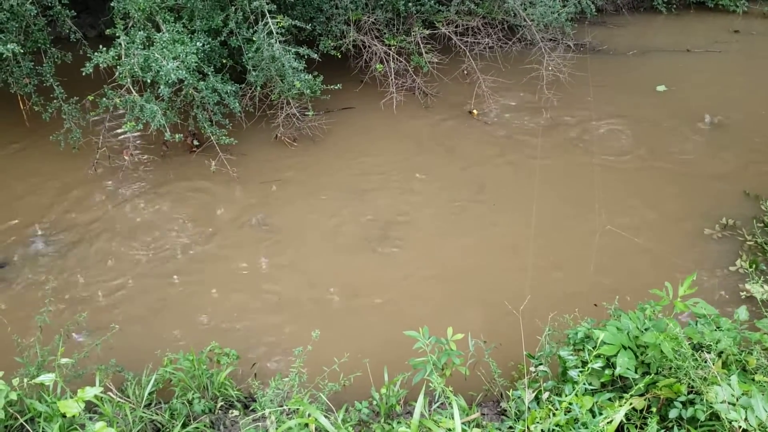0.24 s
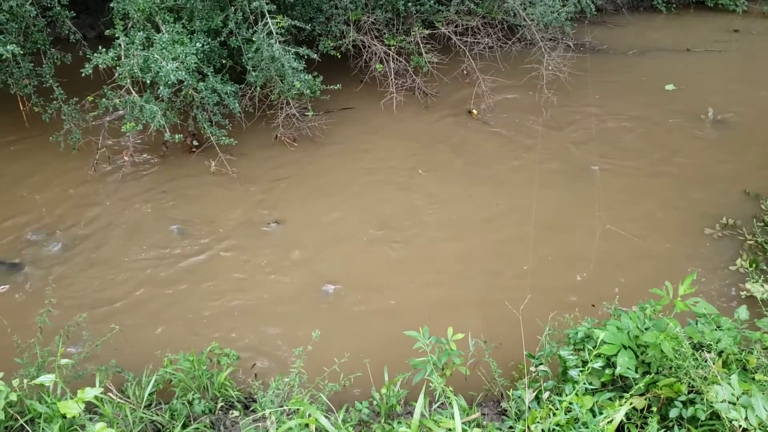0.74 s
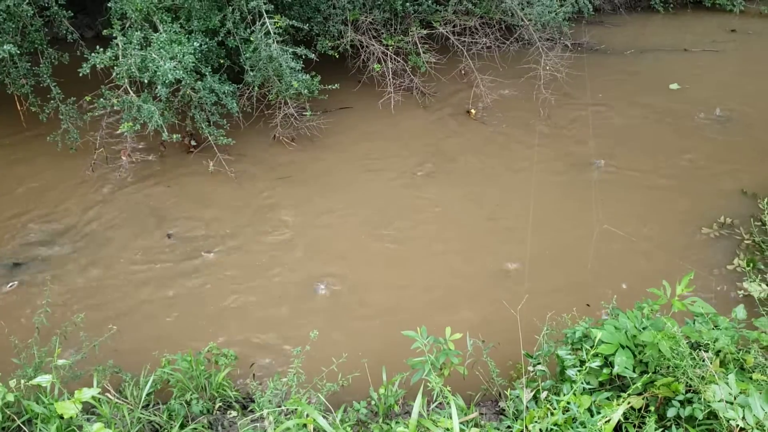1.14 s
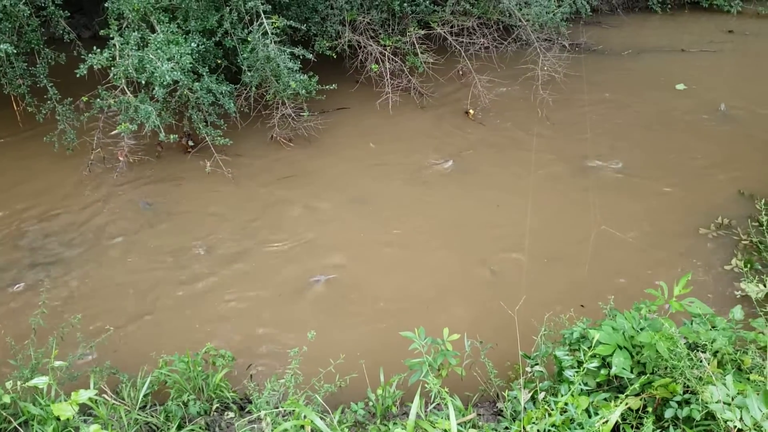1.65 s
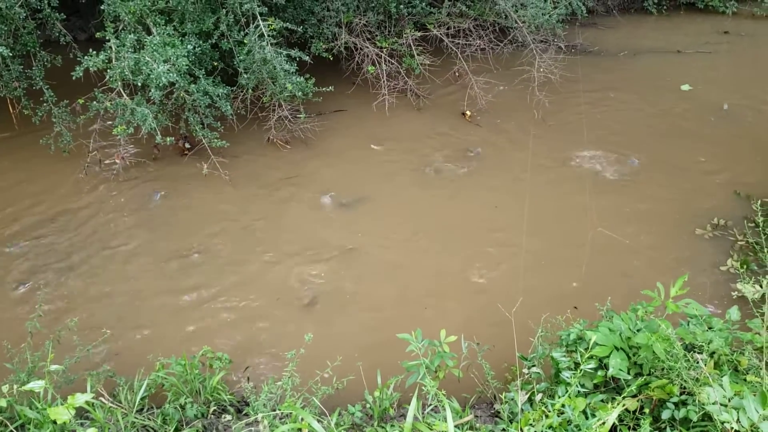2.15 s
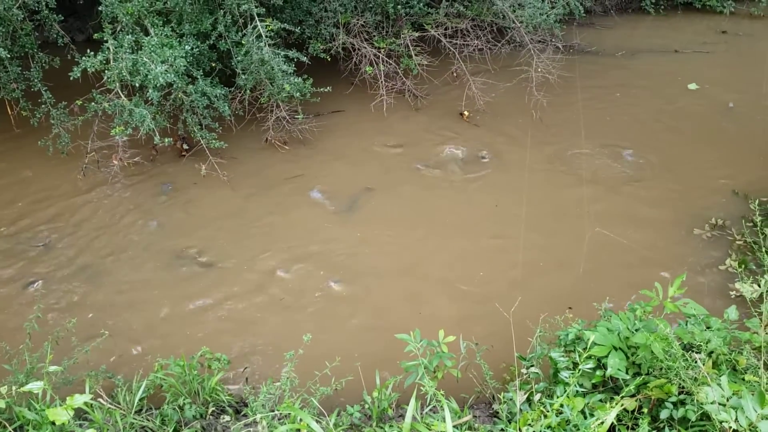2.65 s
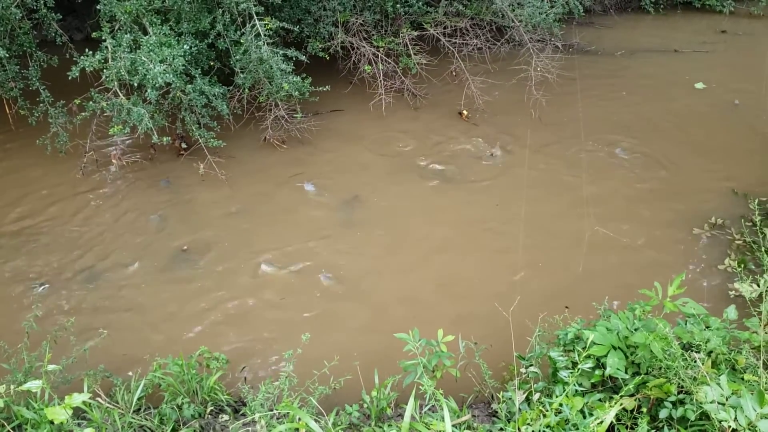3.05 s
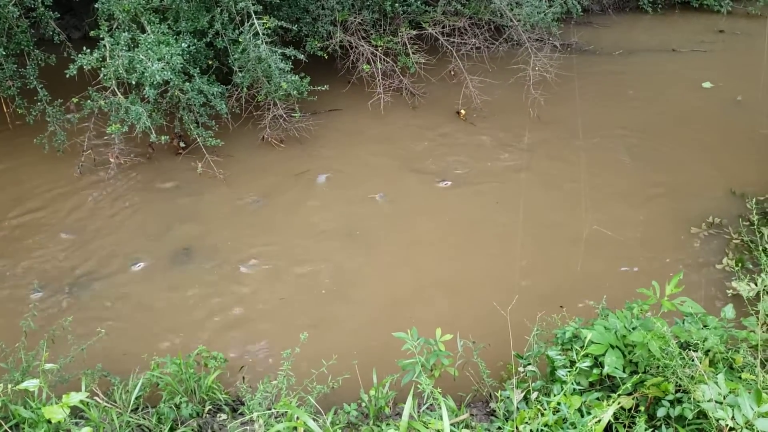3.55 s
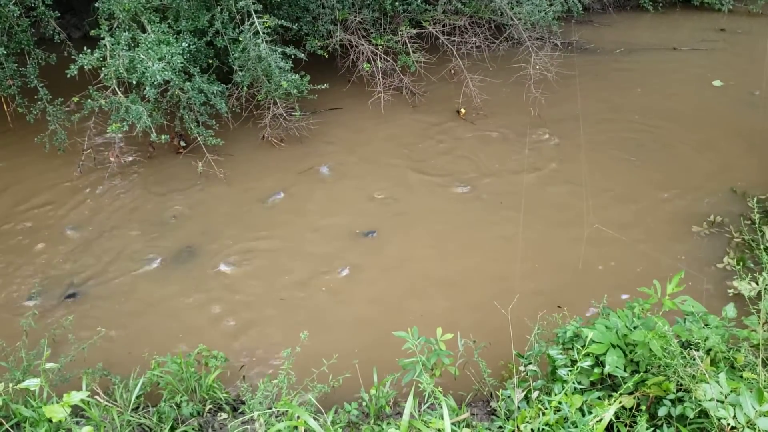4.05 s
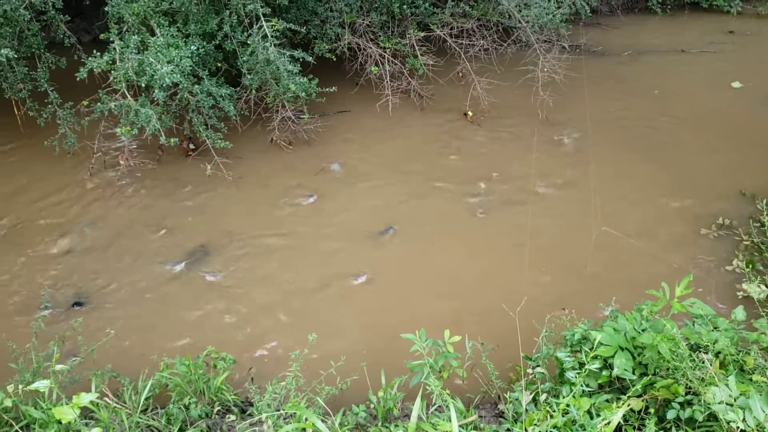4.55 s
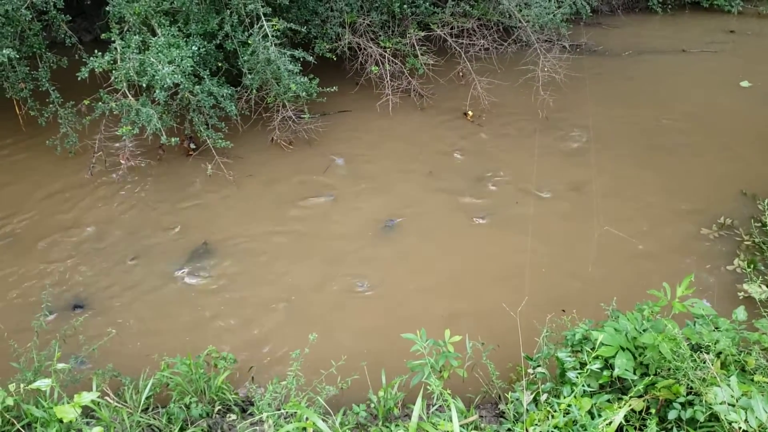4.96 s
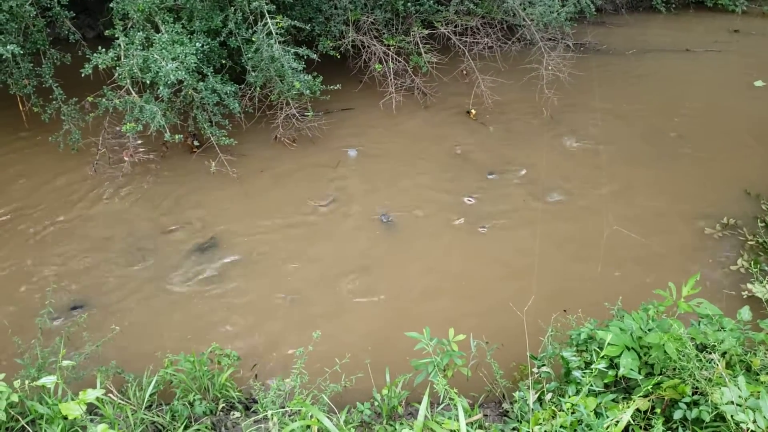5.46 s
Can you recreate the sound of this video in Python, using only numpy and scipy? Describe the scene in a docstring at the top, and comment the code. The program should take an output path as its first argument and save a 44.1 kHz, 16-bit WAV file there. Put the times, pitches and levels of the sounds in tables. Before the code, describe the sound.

Watery plops and two crackling bursts of churning splashes, close by, over a quiet low outdoor rumble with faint insect hiss.

```python
"""A far rumble, a wavering motor-like note and a thin insect hiss lie under a muddy creek, all shaped noise.
From the start, fish gulp and plop as ringing air pockets, fine spray puffs up, needle-thin ticks fall
and a breathy hiss fades. At about 1.5-2.9 s and again at 4.6-5.7 s something rushes and crackles close by,
as if water and leaves were churned at the bank: dense cracks, ringing drops and sharp snaps of noise.
The rush reaches the left microphone first, and each microphone colours it in its own way."""
import sys
import numpy as np
from scipy import signal
from scipy.fft import rfft, irfft
from scipy.io import wavfile

SR = 44100
rng = np.random.default_rng(int(sys.argv[2]) if len(sys.argv) > 2 else 0)


def field_ratio(decibels):
    """Amplitude ratio for a level in dB (20 dB per decade); scalars and array-likes work."""
    return 10 ** (np.asarray(decibels, dtype=float) / 20)


def digitize_waveform(pressure):
    """Quantize a signal to 16-bit integers and store it at the path in sys.argv[1].

    Rows of a 2-D input are taken as channels; values are limited to [-1, 1].
    """
    field = np.atleast_2d(pressure).T
    bounded = np.clip(field, -1, 1)
    quanta = np.round(bounded * 32767).astype(np.int16)
    wavfile.write(sys.argv[1], SR, quanta)


N = 251792  # length in samples

# Spectrum of the steady surroundings: pitch_hz, left_db_per_hz, right_db_per_hz
AIR_SPECTRUM = [(28.5, -74, -94), (56, -70, -66.5), (90, -66, -67.5), (106, -72.5, -77.5), (148, -84, -78),
                (293, -88.5, -88.5), (515, -98, -97), (1060, -97, -91), (1700, -103, -92.5),
                (2140, -108, -103), (4200, -112, -102), (6700, -108, -101), (7650, -114, -105),
                (9680, -100, -93.5), (10500, -110, -104), (13400, -112, -103), (15000, -110, -112)]
# How alike the surroundings are at both ears: pitch_hz, likeness_0_to_1
AIR_LIKENESS = [(60, 1), (260, 0.94), (600, 0.3), (1100, 0.88), (2000, 0.16), (3500, 0.15), (9000, 0.021)]
# Gulps and plops, level before swell and pan: start_s, level_db, pitch_hz, right_lead_ms
BUBBLES = [(.017, -43, 375, 0.18), (0.175, -34, 1610, 0.39), (.207, -37.5, 1280, 0.54),
           (.229, -45, 1530, 0.4), (0.339, -51, 1650, 0.25), (.36, -38.5, 1760, 0.27),
           (.379, -45, 1410, 0.35), (.466, -49.5, 4560, .23), (.467, -42.5, 1555, .3),
           (0.626, -47.5, 1680, 0.32), (.649, -39, 1830, .38), (0.683, -46, 4700, .13),
           (.667, -52, 2180, 0.36), (.68, -51, 1540, 0.23), (.816, -43.5, 1550, 0.23),
           (0.836, -48, 1930, 0.41), (1.133, -50, 1540, 0.75), (1.2857, -48, 3180, .22),
           (1.348, -44.5, 1370, 0.51), (1.37, -50, 900, 0.44), (1.399, -42, 2960, 0.25),
           (1.416, -51, 1620, .54), (1.452, -46, 750, 0.34), (1.562, -47, 975, 0.85),
           (1.925, -34, 810, 0.23), (1.944, -46, 940, -0.0054), (2.14, -42, 720, 0.022),
           (2.64, -50, 830, 0.26), (2.685, -48, 1240, .3), (2.81, -50, 1890, 0.26), (2.96, -58, 900, .14),
           (3.01, -47.5, 900, 0.22), (3.012, -50, 1420, 0.57), (3.097, -51.5, 930, 0.23),
           (3.098, -48, 1520, .43), (3.115, -51, 760, .22), (3.166, -54, 940, 0.39),
           (3.245, -49, 3400, .28), (3.287, -51, 1660, 0.075), (4.129, -52.5, 966, -.13),
           (4.373, -38.5, 857, 0.053), (4.471, -34, 1590, 0.36), (4.53, -34, 188, -0.21),
           (4.53, -29.5, 481, -0.37), (4.541, -37, 407, -0.27), (5.663, -49, 905, .03)]
# Necks of air that close slowly and whistle upward: start_s, level_db, pitch_hz, right_lead_ms
GLIDES = [(3.022, -58, 1025, .72), (4.39, -52.5, 953, -0.2), (4.551, -48.5, 695, .09),
          (4.583, -55, 900, 0.26), (4.591, -54.5, 1255, 0.2), (5.64, -52, 960, 0.2)]
# Low gurgles that nearly hold their pitch: start_s, level_db, pitch_hz, right_lead_ms
GURGLES = [(.405, -53, 750, 0.29), (.42, -51, 696, 0.3), (.517, -52, 688, .25), (.533, -54, 658, .2),
           (.551, -48, 695, .17), (.702, -54, 765, -.21), (.724, -56, 1047, -0.2), (.745, -61, 900, -0.14),
           (.767, -59, 834, -0.42), (2.712, -40, 440, -.3)]
# Stereo balance of the bubbles: pitch_hz, left_over_right_db
WATER_PAN = [(300, 0), (800, -7.5), (1600, -11.5), (4000, -19.5)]
# Reflections of the bubbles from the banks: delay_s, level_db
BANK_ECHOES = [(0.013, -12), (.023, -19.5), (.041, -35)]
# Colour of nearby sounds at each microphone: pitch_hz, left_db, right_db
RUSH_COLOUR = [(201, -2, -11.5), (265, -6, -10.5), (414, 1, 4.5), (560, -11.5, -8), (900, -0.5, -3),
               (1280, -0.5, 2.5), (1980, -2, 5), (2970, 0.5, 1), (3560, -6, 1), (3900, -4.5, 0.5),
               (4700, -5.5, 3), (6340, -10, 2.5), (7130, -12.5, -8), (8320, -10, -4), (10760, -7, -10.5),
               (12100, -2, -1), (16400, -13, -1.5)]
# Borders between body, spatter, crackle and sizzle: pitch_hz
RUSH_EDGES_HZ = 615, 2700, 8360
# Body, spatter, crackle, sizzle: octaves_above_1_khz, level_db at full vigour before tilt, vigour_share
PARTS = [(-1.85, -45, 1), (0.86, -46.5, 0.83), (2.5, -43.5, 1.25), (3.5, -60.5, 0.33)]
# How hard the bank is churned: time_s, vigour_db, brightness_db_per_octave
CHURN = [(1.3, -84.5, -5), (1.531, -60.5, 0), (1.556, -56, -3.5), (1.59, -45, 0), (1.68, -68.5, -2.5),
         (1.759, -56, -3.5), (1.839, -61, -2), (1.863, -49, -2), (1.95, -57, -2.5), (1.987, -43, -1.5),
         (2.09, -40.5, 1.5), (2.16, -53.5, 0.5), (2.27, -41.5, 2.5), (2.31, -45.5, 2), (2.4, -41, 1.5),
         (2.49, -51, 0), (2.57, -53, 0.5), (2.62, -49, -1.5), (2.659, -59.5, -0.5), (2.86, -62, -1.5),
         (2.93, -73.5, 2), (4.299, -77.5, -1.5), (4.62, -63.5, -0.5), (4.72, -62.5, -3), (4.84, -57, -3),
         (4.976, -40.5, 1), (5.055, -47.5, 0), (5.15, -41, 0.5), (5.215, -49, 0.5), (5.31, -41, 2.5),
         (5.36, -43.5, 2), (5.39, -43.5, 0.5), (5.47, -46.5, 3.5), (5.57, -50.5, -0.5), (5.71, -64, 1.5)]
# Puffs of fine spray: peak_s, level_db, swell_s, t60_s
SPRAYS = [(.03, -56, 0.033, 1.6), (.235, -54, 0.15, 2.2), (.92, -61, 0.24, 0.27), (1.4, -60.5, 0.075, 0.47),
          (1.939, -48, .02, 0.49), (3.675, -49, 0.074, 0.18), (4.14, -59, 0.047, 0.79),
          (4.32, -51, 0.045, .9), (4.69, -60, 0.12, 1.3)]
# Thin high ticks, as of single drops on leaves: start_s, level_db
TICKS = [(.032, -40.5), (.0804, -44), (0.2282, -26.5), (.286, -40), (0.3126, -33), (0.3993, -33),
         (0.456, -40), (.517, -48), (2.3955, -24), (2.405, -25), (2.579, -38), (3.349, -50), (4.205, -44),
         (4.3374, -36)]
# The breathy hiss: pitch_hz, width_hz, level_db, t60_s, left_over_right_db
BREATHY_HISS = (5050, 1000, -52, .55, -5)
# Snaps in the rush, level before trims: start_s, level_db, brightest_octave_above_1_khz, loss_db_per_octave
SNAPS = [(0.2118, -40, 3.6, 10), (0.2277, -48, 4.5, 3), (.683, -37.5, 4.3, 16), (1.285, -53, 5, 3),
         (1.399, -50.5, 8, 1), (1.5476, -42.5, 2, 3.5), (1.5889, -36.5, -3, 1), (1.924, -44, 6, -2),
         (1.9704, -35, 7, 10), (2.0917, -39, 8, -1.5), (2.1157, -30, 1.5, 13), (2.1449, -34.5, 1.3, 10),
         (2.2107, -33.5, 0, 2), (2.371, -28, -1, 2.5), (2.3935, -26.5, 1.5, 27), (2.4028, -25.5, 2.5, 18),
         (2.41, -37, 3.5, 13), (2.453, -36, 3, 5), (2.4743, -35, 7, 3.5), (2.488, -29, 0.3, 6.5),
         (2.5037, -29, 1.45, 5), (2.516, -32, 3, 12), (2.5427, -34.5, 0.6, 6.5), (2.578, -37, 2.2, 0.5),
         (2.613, -37.5, 1, 1.5), (2.621, -39, 3, 5), (2.7117, -48, 3, 8), (2.828, -48, -1, 7),
         (2.735, -40.5, 2.5, 9.5), (2.7917, -29.5, -1, 4), (2.8662, -31, -1.5, 2), (4.127, -56, 6, 4),
         (4.291, -40, 5.5, 4), (4.3152, -35.5, 2, 6), (4.435, -29, 5.5, 4.5), (4.6497, -56, 3, 14),
         (4.7308, -49.5, -0.5, 0.5), (4.883, -27, -0.84, 5.5), (5.1332, -16.5, 0.33, 15),
         (5.151, -30.5, 1.8, 14), (5.3028, -28.5, 2, 6.5), (5.39, -24, 2.5, 12), (5.42, -30, -1.7, 11),
         (5.4363, -26, 1.3, 6.5), (5.475, -33.5, 3.5, 1.5), (5.509, -41.5, 2.4, -2), (5.543, -30, 4.5, 3.5),
         (5.5606, -17, -0.06, 14), (5.6075, -33.5, 1.74, 7), (5.64, -31, 0.3, 7),
         (5.6975, -33.5, -0.3, 7.5)]

WATER_LEAD_S = 0.000341  # the surroundings reach the right microphone first
HUM_HZ, HUM_WIDTH_HZ, HUM_DB = 122.4, 4.7, -53.5
# A bubble rings and climbs most near one size; KEPT is the share left per octave away
BEST_HZ, BEST_T60_S, BEST_RISE_OCTAVES_PER_S, T60_KEPT, RISE_KEPT = 900, .032, 30, .36, .5
GLIDE_RISE_OCTAVES_PER_S, GLIDE_T60_S = 20, .075
GURGLE_RISE_OCTAVES_PER_S, GURGLE_T60_S = 0.5, 0.046
SWELL_CYCLES, FADE_POWER = 1.5, 1.8  # time constant of the swell; above 1 the fade gets ever faster
FAINT_PER_S, FAINT_FLOOR_DB = 45, -69  # faint bubbles: rate and quietest level
LEFT_LEAD_S, RUSH_SPREAD = .00048, .68  # left hears nearby sounds first; scattered share at the right (0-1)
FULL_VIGOUR_DB = -42
SPRAY_SWELL_DB, SPRAY_SPILL_DB = 20, -17  # climb over the swell time; how much reaches the crackle
TICK_T60_S, TICK_LOW_HZ = 0.0058, 9100
HISS_START_S = .044
SNAP_T60_S = 0.014  # before each part's own stretch
# A snap cracks twice and leaves a patter; gap and second level vary by chance
REBOUND_S, REBOUND_DB, PATTER_DB, PATTER_LASTS = .0045, -6, -16.5, 12


def rms_one(x):
    """Scale to rms 1."""
    return x / np.sqrt(np.mean(x ** 2) + 1e-20)


def at_hz(points, hz, axis=1):
    """Read a column of a spectrum table on a log-frequency axis."""
    points = np.array(points)
    return np.interp(np.log(hz + 1e-9), np.log(points[:, 0]), points[:, axis])


def drift(rate_hz):
    """Random wander of spread 1: noise through two equal low-pass poles, drawn at every 20th sample."""
    r = np.exp(-40 * np.pi * rate_hz / SR)
    noise = rng.standard_normal(N // 20 + 4002)
    slow = signal.lfilter([1], [1, -2 * r, r * r], noise)[4000:]  # skip the filter's run-in
    return np.interp(np.arange(N) / 20, np.arange(len(slow)), rms_one(slow))


def band(x, low_hz, high_hz, order=2):
    """Butterworth band-pass."""
    edges = [low_hz, min(high_hz, .45 * SR)]
    return signal.sosfilt(signal.butter(order, edges, "band", fs=SR, output="sos"), x)


def surroundings():
    """Far rumble, water and insects as steady noise, with its likeness at the two ears set by frequency."""
    hz = np.fft.rfftfreq(N, 1 / SR)
    mid, side = rfft(rng.standard_normal((2, N)))
    alike = np.clip(at_hz(AIR_LIKENESS, hz), 0, 1)
    pair = np.sqrt(1 + alike) * mid + np.sqrt(1 - alike) * side * [[1], [-1]]
    pair = pair * np.sqrt(SR / 4)  # makes the table read in dB per Hz
    pair[0] *= np.exp(-2j * np.pi * hz * WATER_LEAD_S)  # left hears later
    levels_db = [at_hz(AIR_SPECTRUM, hz, axis=1), at_hz(AIR_SPECTRUM, hz, axis=2)]
    air = irfft(pair * field_ratio(levels_db), N)
    return air * field_ratio(.4 * drift(2.))


def hum():
    """A far motor note that wavers: noise in a narrow resonance."""
    low_hz, high_hz = HUM_HZ - HUM_WIDTH_HZ / 2, HUM_HZ + HUM_WIDTH_HZ / 2
    return field_ratio(HUM_DB) * rms_one(band(rng.standard_normal(N), low_hz, high_hz, order=1))


def add_bubble(out, start_s, level_db, hz, rise, t60, lead_s):
    """Adds a ringing air pocket: its pitch climbs as it nears the surface and it dies away."""
    t = np.arange(int(.15 * SR)) / SR
    pitch_hz = hz * 2 ** np.minimum(rise * t, 1.5)  # climbs at most 1.5 octaves
    phase = 2 * np.pi * np.cumsum(pitch_hz) / SR
    fade = field_ratio(level_db - 60 * (t / max(t60, .005)) ** FADE_POWER)
    swell = 1 - np.exp(-t * hz / SWELL_CYCLES)
    ring = fade * swell * np.sin(phase)
    for side, sign in enumerate((1, -1)):
        at = max(round((start_s + sign * lead_s / 2) * SR), 0)
        pan = field_ratio(sign * at_hz(WATER_PAN, hz) / 2)
        out[side, at:at + len(t)] += pan * ring[:N - at]


def bubbles():
    """Gulps, plops, glides, gurgles and many faint bubbles, as ringing air pockets with echoes from the banks."""
    out = np.zeros((2, N))
    for start_s, db, hz, lead_ms in BUBBLES:
        octaves_away = abs(np.log2(hz / BEST_HZ))
        rise = BEST_RISE_OCTAVES_PER_S * RISE_KEPT ** octaves_away
        t60 = max(BEST_T60_S * T60_KEPT ** octaves_away, 9.3 / hz)
        add_bubble(out, start_s, db, hz, rise, t60, lead_ms / 1000)
    for start_s, db, hz, lead_ms in GLIDES:
        add_bubble(out, start_s, db, hz, GLIDE_RISE_OCTAVES_PER_S, GLIDE_T60_S, lead_ms / 1000)
    for start_s, db, hz, lead_ms in GURGLES:
        add_bubble(out, start_s, db, hz, GURGLE_RISE_OCTAVES_PER_S, GURGLE_T60_S, lead_ms / 1000)
    draws = rng.random((800, 5))
    starts_s = np.cumsum(-np.log(1 - draws[:, 0])) / FAINT_PER_S
    for start_s, row in zip(starts_s, draws):
        if start_s < N / SR:
            hz = 700 * 2 ** (1.42 * row[1])
            db = FAINT_FLOOR_DB - 3 * np.log(1 - .95 * row[2])
            add_bubble(out, start_s, db, hz, 12 * row[3], 23.0 / hz, WATER_LEAD_S * 2.2 * row[4])
    swapped = out[::-1]  # echoes return with left and right exchanged
    echoes = sum(field_ratio(db) * np.pad(swapped, ((0, 0), (round(delay_s * SR), 0)))[:, :N]
                 for delay_s, db in BANK_ECHOES)
    return out + echoes


def colour(x, table, axis):
    """A causal (minimum-phase) filter that follows one column of a spectrum table."""
    size = 4096
    gain = field_ratio(at_hz(table, np.fft.rfftfreq(size, 1 / SR), axis=axis))
    cepstrum = irfft(np.log(gain))
    cepstrum[1:size // 2] *= 2  # folding the cepstrum gives minimum phase
    impulse = irfft(np.exp(rfft(cepstrum[:size // 2], size)))
    return signal.fftconvolve(x, impulse)[:N]


def two_ears(x, other):
    """The left hears first; part of what reaches the right has scattered and is unlike the left."""
    late = np.interp(np.arange(N) - LEFT_LEAD_S * SR, np.arange(N), x)
    right = np.sqrt(1 - RUSH_SPREAD ** 2) * late + RUSH_SPREAD * other
    return np.array([colour(x, RUSH_COLOUR, axis=1), colour(right, RUSH_COLOUR, axis=2)])


def rush_bands(pair):
    """Body, spatter, crackle and sizzle parts of a stereo sound."""
    edges = [150., *RUSH_EDGES_HZ, 18000.]
    return [(-1) ** k * band(pair, low, high)  # alternate signs join neighbours without a notch
            for k, (low, high) in enumerate(zip(edges, edges[1:]))]


def droplets(per_s=1400., cycles=11.0, size_db=1.0):
    """Drops land at random, each ringing a few cycles on one of 20 pitches."""
    sizes = field_ratio(size_db * np.minimum(rng.exponential(1, N), 4)) * rng.choice([-1, 1], N)
    sizes *= rng.random(N) < per_s / SR
    pitches_hz = np.geomspace(350., 12000., 20)
    dealt = rng.integers(0, 20, N)
    out = np.zeros(N)
    for k, hz in enumerate(pitches_hz):
        r = field_ratio(-60 * hz / (cycles * SR))  # 60 dB down after the given cycles
        w = 2 * np.pi * hz / SR
        ringing = signal.lfilter([1], [1, -2 * r * np.cos(w), r * r], sizes * (dealt == k) + 1e-18)
        out += np.sqrt(hz) * rms_one(ringing)
    return rms_one(out)


def part_levels():
    """Gain of each part in time: vigour lifts them, brightness tips them, spray adds to the top."""
    t = np.arange(N) / SR
    times_s, *controls = np.transpose(CHURN)
    vigour_db, brightness = (np.interp(t, times_s, c) for c in controls)
    power = []
    for octave, db, share in PARTS:
        tilt_db = brightness * (octave - 1.5)
        power.append(field_ratio(2 * (db + share * (vigour_db - FULL_VIGOUR_DB) + tilt_db)))
    spray = np.zeros(N)
    for peak_s, db, swell_s, t60 in SPRAYS:
        since = t - peak_s
        shape_db = np.where(since < 0, SPRAY_SWELL_DB * since / swell_s, -60 * since / t60)
        spray += field_ratio(2 * (db + shape_db))
    return np.sqrt([*power[:2], power[2] + field_ratio(2 * SPRAY_SPILL_DB) * spray, power[3] + spray])


def rush(per_s=2500., size_db=0.5, wet=(1.1, 1.3, 1.1, .6)):
    """Dense tiny cracks of uneven size and ringing drops, in lumps; wet is each part's share of drops."""
    lumps, surges = field_ratio(2.4 * drift(90.)), field_ratio(2.0 * drift(50.))
    sizes = field_ratio(size_db * np.minimum(rng.exponential(1, N), 5)) * (rng.random(N) < per_s / SR)
    envelope = np.sqrt(signal.lfilter([.1], [1, -.9], rms_one(sizes) ** 2))
    cracks = envelope * rng.standard_normal((2, N))
    cracked = rush_bands(two_ears(*(lumps * rms_one(cracks))))
    splashed = rush_bands(two_ears(surges * droplets(), surges * rng.standard_normal(N)))
    parts = [crack + share * drops for crack, drops, share in zip(cracked, splashed, wet)]
    return sum(gain * part / np.std(part.mean(axis=0)) for gain, part in zip(part_levels(), parts))


def ticks():
    """Each tick is a needle of treble noise, struck and dying within milliseconds."""
    clicks = np.zeros(N)
    starts_s, levels_db = np.transpose(TICKS)
    clicks[np.round(starts_s * SR).astype(int)] = field_ratio(levels_db)
    treble = band(two_ears(*rng.standard_normal((2, N))), TICK_LOW_HZ, 18000., order=4)
    decay = field_ratio(-60 / (TICK_T60_S * SR))
    return signal.lfilter([1], [1, -decay], clicks + 1e-18) * rms_one(treble)


def breathy_hiss():
    """Noise in one resonance, struck and fading."""
    hz, width_hz, db, t60, pan_db = BREATHY_HISS
    t = np.arange(N) / SR - HISS_START_S
    tone = rms_one(band(rng.standard_normal((2, N)), hz - width_hz / 2, hz + width_hz / 2))
    side_db = np.array([[pan_db], [-pan_db]]) / 2
    return tone * (t > 0) * field_ratio(db - 60 * np.maximum(t, 0) / t60 + side_db)


def snaps(trim_db=(-8., -6., 1.5, 1.5), stretch=(2.5, 1.1, .8, .6), attack_s=0.00094):
    """Each snap is two quick bursts of noise and a patter; its body lasts longer than its sizzle."""
    parts = rush_bands(two_ears(*rng.standard_normal((2, N))))
    parts = [part / np.std(part.mean(axis=0)) for part in parts]
    out = np.zeros((2, N))
    t = np.arange(int(.12 * SR)) / SR
    chances = rng.random((len(SNAPS), 2))
    for (start_s, db, brightest, loss_db), (gap, jolt) in zip(SNAPS, chances):
        start = round(start_s * SR)
        at = slice(start, min(start + len(t), N))
        late = t - REBOUND_S * (.5 + gap)
        for part, (octave, *_), trim, longer in zip(parts, PARTS, trim_db, stretch):
            fall = -60 / (longer * SNAP_T60_S)  # dB per s
            first = field_ratio(fall * t)
            second = (late > 0) * field_ratio(REBOUND_DB - 6.2 * jolt + fall * np.abs(late))
            patter = field_ratio(PATTER_DB + fall * t / PATTER_LASTS)
            shape = (first + second + patter) * np.minimum(t / attack_s, 1)
            shape = shape * field_ratio(db + trim - max(loss_db, 0) * abs(octave - brightest))
            out[:, at] += shape[:at.stop - at.start] * part[:, at]
    return out


def scene():
    """All sources, left and right."""
    return surroundings() + hum() + bubbles() + rush() + ticks() + breathy_hiss() + snaps()


def band_limit(x):
    """A steep low-pass at the top of the band."""
    return signal.sosfilt(signal.butter(12, 17010, fs=SR, output="sos"), x)


def record(dry):
    """The lowest bass and the top are cut."""
    no_rumble = signal.sosfilt(signal.butter(4, 30., "high", fs=SR, output="sos"), dry)
    finished = signal.sosfilt(signal.cheby2(14, 30, 15900, fs=SR, output="sos"), no_rumble)
    return band_limit(finished)


dry = scene()
out = record(dry)
digitize_waveform(out)
```